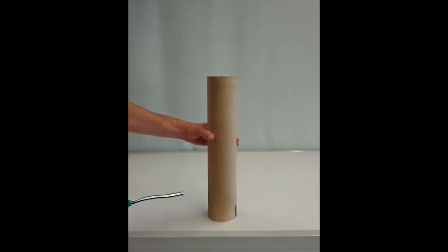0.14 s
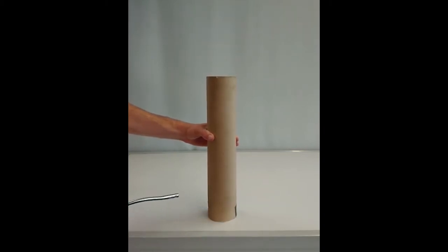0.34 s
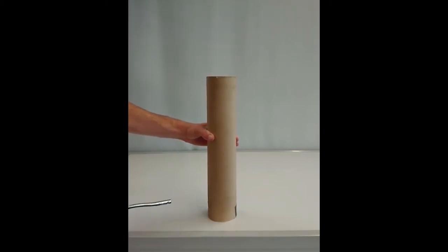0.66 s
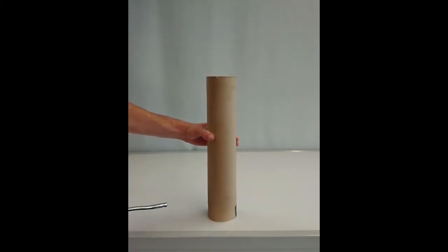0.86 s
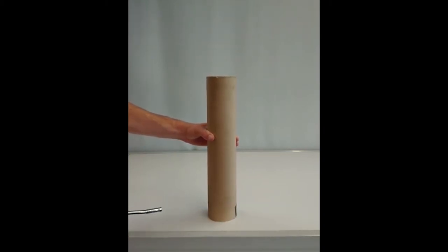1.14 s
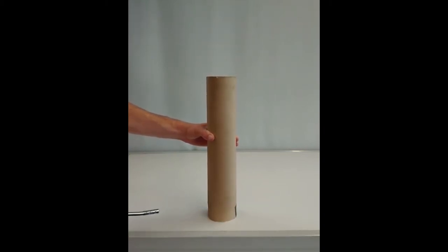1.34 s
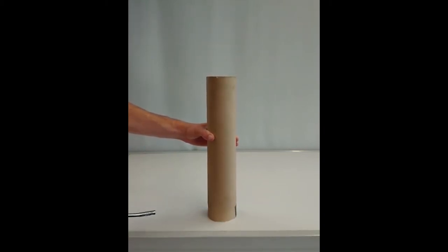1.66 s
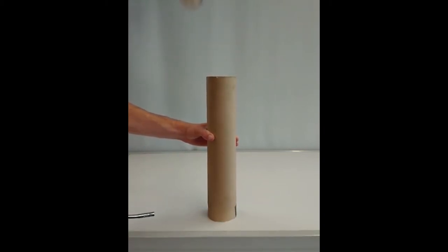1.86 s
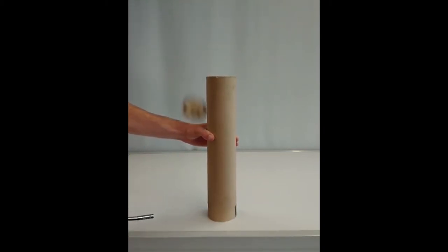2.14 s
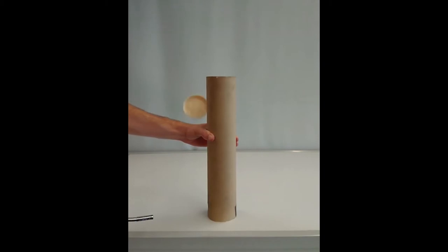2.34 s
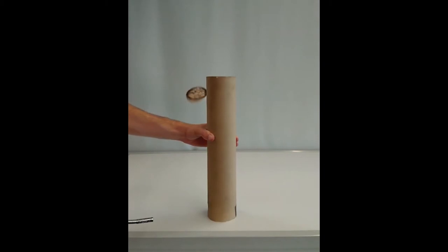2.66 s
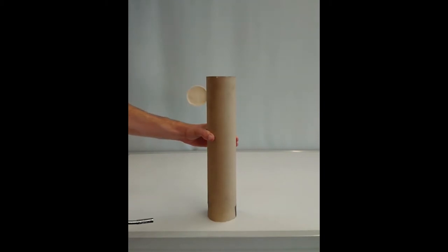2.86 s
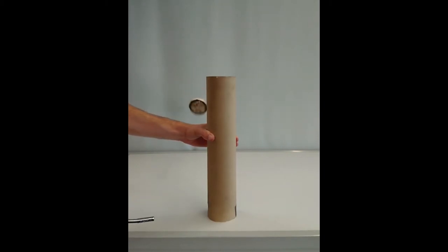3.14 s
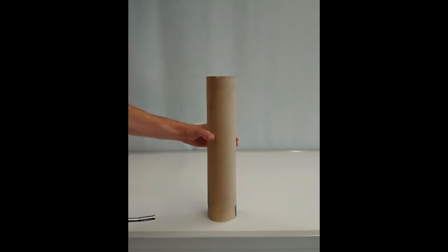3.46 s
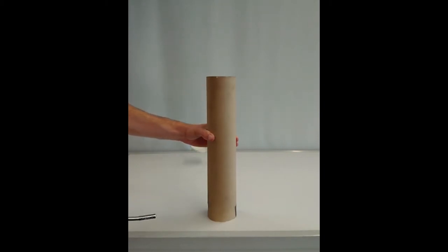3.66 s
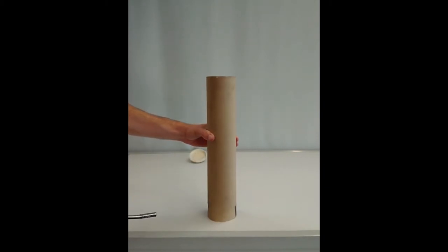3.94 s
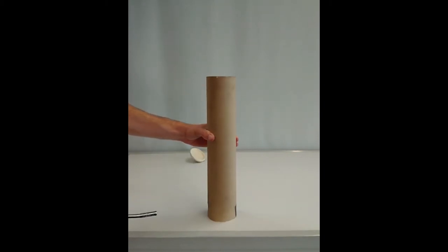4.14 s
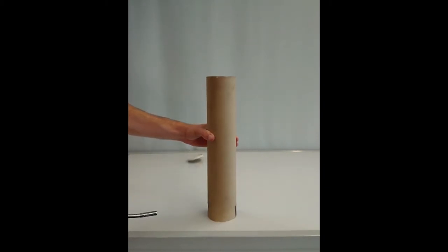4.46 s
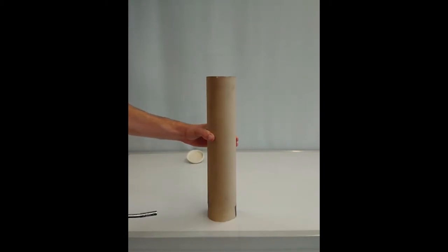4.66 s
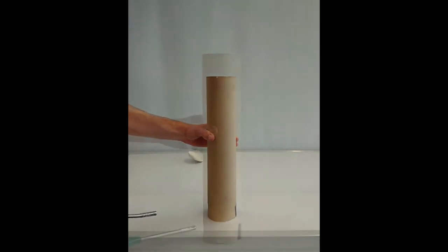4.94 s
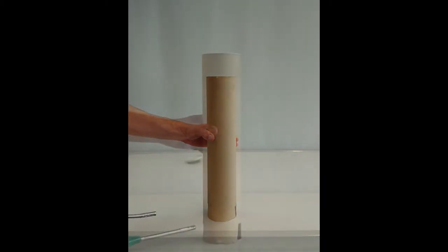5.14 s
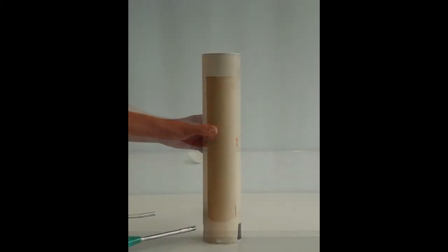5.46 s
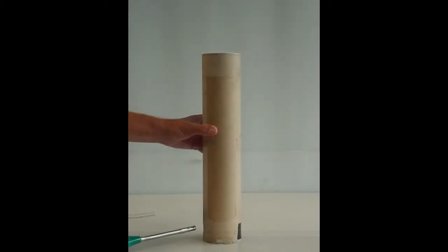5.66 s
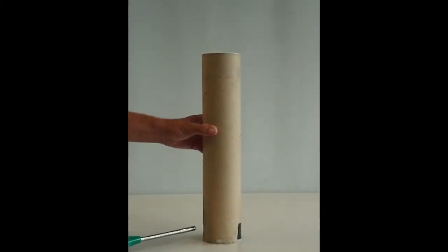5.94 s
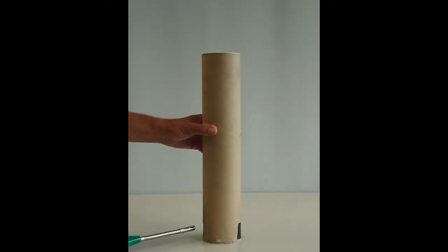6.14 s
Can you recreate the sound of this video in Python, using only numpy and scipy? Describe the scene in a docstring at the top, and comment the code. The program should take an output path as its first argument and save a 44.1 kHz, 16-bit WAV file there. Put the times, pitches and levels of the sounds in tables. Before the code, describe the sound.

Quarter-speed sound in a bare, echoing room. The dark boom of a gas pop is already dying away when a lid slaps the ceiling, leaving a bright wash of echo. About two seconds later it thuds dully on a hand, then clatters hard on a table in a tight burst of knocks. The ringing fades into a quieter room tone. Stereo microphones, with a grainy slowed treble.

```python
"""A lid, shot off a cardboard tube by a gas pop in a bare room, is heard at quarter speed.
It slaps the ceiling, thuds on a hand and clatters on the table: shaped clicks, echoes and damped swings.
Fading noise makes the boom of the pop and the long ring after each blow; steady noise and a drone lie below.
A dissolve then leads to a quieter shot of the room. The slow playback mirrors sound into the treble."""
import sys
import numpy as np
from scipy import signal
from scipy.fft import rfft, irfft, next_fast_len
from scipy.io import wavfile

SR = 44100
rng = np.random.default_rng(int(sys.argv[2]) if len(sys.argv) > 2 else 0)


def store_pcm(level_fs):
    """Save levels as 16-bit WAV."""
    pcm = np.round(np.clip(level_fs, -1, 1) * 32767).astype(np.int16)
    wavfile.write(sys.argv[1], SR, np.atleast_2d(pcm).T)


def gain_from_db(level_db):
    """Turn a decibel level (scalar or array-like) into a linear amplitude factor."""
    decades = np.asarray(level_db, float) / 20
    return 10 ** decades


N = 277389  # length in samples

# Blows of the lid, their clearest echoes and two late taps. Each row: start in seconds, click peak in dB,
# lean to the left in dB (98 % of it is used), delay of the right port in ms, dulling in dB per octave.
ARRIVALS = [(0.2742, -14, 3.9, 1.7, -4), (0.303, -24, -12, -0.6, -0.5), (0.343, -25.5, 14, -2.3, -1.5),
            (2.4945, -24.5, -0.5, 0.6, -3.5), (2.532, -30.5, -1.5, -0.8, -6), (2.551, -34.5, -5, 0.9, 3.5),
            (4.0911, -9, -0.5, -0.9, -2.4), (4.1053, -9, 4, 0.3, -2.5), (4.1150, -12.5, -1, -1, -2),
            (4.1234, -14.5, -2, 2, -7), (4.1515, -16, -4.5, 0.8, -5.5), (4.1832, -14, 2.5, -0.2, -5),
            (4.187, -20, -10, 0.2, 0.5), (4.2166, -15, 2, 2, -0.5), (4.244, -18.5, -4, 1.1, -1),
            (4.296, -21, 0, 0.5, 0.5), (4.321, -21, 4.5, -.14, 2), (4.351, -23, 0, 0, -3.5),
            (5.422, -42.5, -11.5, 0.4, 6), (5.6170, -34.5, -1, -0.5, 1.5)]
# Colour of the lid's blow on ceiling, hand and table. Each row: pitch in Hz, relative level in dB.
BLOW_COLOURS = [
    [(88, -39), (150, -2.5), (249, -9), (389, -12.5), (813, -8), (1500, -28), (1730, -14.5), (2210, -16),
     (2610, -11.5), (3190, -13.5), (4080, -25), (4410, -42), (5900, -53), (7670, -80), (13000, -120)],
    [(71, -34.5), (120, 0.5), (219, -7.5), (480, -13.5), (982, -14.5), (1140, -22.5), (1270, -24),
     (1550, -25.5), (2150, -35.5), (2500, -34.5), (2790, -43), (3180, -42), (4330, -65), (5900, -85.5),
     (7670, -109), (13000, -120)],
    [(88, -25.5), (150, -11.5), (265, -2.5), (545, -4), (697, -0.5), (878, -4.5), (1290, -11.5),
     (1370, -16.5), (2140, -19.5), (3000, -30), (3960, -42.5), (4270, -52.5), (5900, -62.5), (7670, -94.5),
     (13000, -120)],
]
# Ring of the room after pop, ceiling, hand and table. Each row: start in seconds, level in dB before
# build-up and fading, build-up time in seconds, factor on the room's fading time.
RINGS = [(-.3, -29, .011, 1.41), (0.273, -37.5, 0.005, 1.214), (2.494, -37.5, 0.0067, 0.84),
         (4.088, -30.5, 0.04, 1.267)]
# Colour of each of these rings. Each row: pitch in Hz, relative level in dB.
RING_COLOURS = [
    [(12, -36.5), (20, -14), (54, -6.5), (110, -18.5), (138, -16.5), (189, -27), (297, -38.5), (729, -44),
     (1120, -35), (1500, -47), (1670, -41.5), (3280, -44.5), (4300, -55.5), (5590, -100), (9460, -120)],
    [(120, -14.5), (200, 1), (276, -5), (455, -10), (770, -5.5), (910, -7.5), (1090, -8.5), (1320, -10),
     (1680, -10), (2570, -10.5), (3280, -6.5), (4030, -20), (4300, -54.5), (5590, -67), (9460, -120)],
    [(12, -61.5), (20, -7.5), (43, -17.5), (86, -2), (135, -12), (297, -12.5), (339, -20), (623, -13),
     (762, -20), (872, -20.5), (954, -22), (2000, -36.5), (3280, -38.5), (4300, -56.5), (5590, -105),
     (9460, -120)],
    [(12, -39.5), (20, -2), (48, -29.5), (92, -9), (129, -21.5), (221, -4), (397, -6), (681, 1), (1310, -9),
     (1670, -8.5), (2870, -14), (3840, -19), (4300, -24), (5590, -84), (9460, -120)],
]
# Resonances that stand out of each ring. Each row: centre in Hz, added height in dB, width in Hz.
RING_PEAKS = [
    [],
    [(745, -9, 120), (1102, 4.5, 230), (1680, -5, 80), (2930, -7, 55)],
    [(90.5, 3, 23), (300, -5, 22)],
    [(98, 6, 29), (194, -9, 20), (517, -7.5, 53), (720, -9, 420), (1144, 3.5, 52), (1637, -2, 55),
     (1820, 4.5, 19)],
]
# How slowly the room fades. Each row: pitch in Hz, seconds to fall 60 dB before the ring's own factor.
ROOM_FADE = [(30, 4.2), (60, 3), (110, 3.11), (280, 3.03), (740, 3.24), (1900, 3.545), (4000, 1.5)]
# How alike left and right are. Each row: pitch in Hz, likeness from 0 to 1.
LIKENESS = [(40, 1), (70, .85), (130, 0.54), (290, .12), (600, .01)]
# Colour of the room tone in the first and second shot. Each row: pitch in Hz, relative level in dB.
TONE_COLOURS = [
    [(12, -38), (20, -10.5), (81, -7), (118, -1.5), (169, -27.5), (237, -15.5), (347, -32), (609, -23),
     (797, -28.5), (872, -13.5), (1400, -37.5), (2680, -29.5), (4300, -43), (5590, -102), (9460, -120)],
    [(12, -30), (20, -1), (27, -7.5), (189, -18.5), (259, -23.5), (355, -9), (397, -23.5), (486, -20.5),
     (745, -36.5), (815, -15), (1070, -41), (1190, -24), (1340, -47), (3280, -41.5), (4300, -35.5),
     (5590, -52), (9460, -120)],
]
# Average (rms) level of the two room tones in dB, before the dissolve.
TONE_LEVELS_DB = [-68.5, -73.5]
# A fuzzy low drone: centre in Hz, width in Hz, rms level in dB before its swell.
DRONE = (62, 14, -67)
# Rise and fall of the drone. Each row: time in seconds, change in dB.
DRONE_SWELL = [(0, 1), (1.3, -3.5), (1.9, 5), (2.498, 3.5), (4.1, -13), (6.3, -41.5)]
# Faint fuzzy tones of the first shot. Each row: centre in Hz, width in Hz, rms level in dB.
WHINES = [(875, 15, -87), (1020, 20, -90), (2592, 6, -96)]
# The dissolve between the shots: start in seconds, end in seconds.
DISSOLVE = (4.72, 5.775)
# Low swing of air and surface under each blow. Each row: start in seconds, pitch in Hz, level in dB,
# seconds to fall 60 dB, left over right in dB.
THUDS = [(0.2801, 121.5, -27, 0.036, -7), (2.4930, 98, -20, 0.086, -2.5), (2.495, 251, -28, 0.037, -3.5),
         (4.0865, 216, -27.5, 0.18, -1.5), (4.096, 95, -31.5, 0.23, -5.5)]
# Difference between the ports, shared out between them. Each row: pitch in Hz, left over right in dB.
PORTS = [(60, -5), (130, -3.5), (250, -5.5), (490, -3.5), (700, -2.5), (1080, 6), (1700, -7), (3100, 5),
         (6000, -3.5), (9000, 1), (15000, -2)]
# Ways the lid rings. Each row: pitch in Hz, relative level in dB, seconds to fall 60 dB if left untouched.
LID_MODES = [(694, -11, 0.28), (1243, 0, 0.0079), (1710, -8, 0.084), (2125, -13.5, 0.052)]
# What trails each arrival from ceiling, hand and table. Each row: ringing of the lid in dB,
# scatter in dB before smearing, seconds for the scatter to fall 60 dB.
TRAILS = [(-30.5, -29, .04), (-27, -18.5, 0.081), (-31.5, -21.5, 0.055)]
# Small echoes strewn by chance behind the blow on ceiling, hand and table. Each row: level in dB
# at the blow, change in dB per second, span in seconds, dulling in dB per octave.
STREWN = [(-25.5, -40, .04, 2.5), (-27, -63, 0.054, 1), (-21.5, -30.5, .012, 0)]
# Number of strewn echoes behind ceiling, hand and table.
STREWN_COUNTS = [2, 2, 2]

HISS_DB = -101
SLOWED_RATE = 48000 / 4  # samples a second left at quarter speed
STEADY_EDGE_HZ = 4150  # the washes end here; late echoes are weak above it
STREWN_SPREAD_DB, STREWN_PAN_DB = 2, 4  # either way
LAG_MS_PER_DB = 0.24  # delay of the right port for each dB of lean to the left
SMEAR_DB_PER_S, SMEAR_MOST_DB = 39.5, 7  # later echoes turn from click to scatter
LONGEST_RING_S = 0.048  # contact damps every mode of the lid to this 60 dB fall time at most


def read(points, hz):
    """Value of a table at a pitch, read along a log axis as we hear pitch."""
    f, value = np.transpose(points)
    return np.interp(np.log(hz + 1), np.log(f + 1), value)


def amp_of(points, hz):
    """Gain read from a table of pitch in Hz and level in dB."""
    return gain_from_db(read(points, hz))


def evened(x):
    """Scaled to an average (rms) strength of 1."""
    return x / np.sqrt(np.mean(x ** 2) + 1e-30)


def fuzzy_tone(centre_hz, width_hz, db, channels):
    """Noise through one narrow resonance sounds like a wavering tone."""
    hz = np.fft.rfftfreq(N, 1 / SR)
    resonance = 1 / (1 + ((hz - centre_hz) / width_hz * 2) ** 2)
    noise = rng.standard_normal((channels, N))
    return gain_from_db(db) * evened(irfft(rfft(noise) * resonance, N))


def hum():
    """A low drone, alike in both ports, with faint whines above it: all narrow noises."""
    swell_db = np.interp(np.arange(N) / SR, *np.transpose(DRONE_SWELL))
    drone = gain_from_db(swell_db) * fuzzy_tone(*DRONE, channels=1)
    return drone + sum(fuzzy_tone(*whine, channels=2) for whine in WHINES)


def diffuse(colour, shape):
    """Sound from all around: two partly alike noises with a fixed colour(Hz), then a gain shape(Hz, s)."""
    size = next_fast_len(N + 4096)
    fine_hz = np.fft.rfftfreq(size, 1 / SR)
    spectra = rfft(rng.standard_normal((2, size)))
    same = np.clip(read(LIKENESS, fine_hz), -1, 1)
    spectra[1] = same * spectra[0] + np.sqrt(1 - same ** 2) * spectra[1]
    edge = 1 + (fine_hz / STEADY_EDGE_HZ) ** 60
    noise = evened(irfft(spectra * colour(fine_hz) / edge, size))
    # Cut into short overlapping slices so that each pitch can change with time.
    hz, t, slices = signal.stft(noise, SR, nperseg=1024, noverlap=768)
    shaped = slices * shape(hz[:, None], t)
    return signal.istft(shaped, SR, nperseg=1024, noverlap=768)[1][:, :N]


def room_tone(colour, db):
    """Steady air and machinery of the building, as coloured noise."""
    return gain_from_db(db) * diffuse(lambda hz: amp_of(colour, hz), lambda hz, t: 1)


def ring(start, db, build, slower, colour, peaks):
    """Echoes thicken after the blow into a wash whose bands die at their own speeds."""
    def tint(hz):
        """Colour in the two ports, with resonances standing out."""
        lift = 1 + sum(gain_from_db(lift_db) / (1 + ((hz - f) / width * 2) ** 2) for f, lift_db, width in peaks)
        lean = gain_from_db(read(PORTS, hz) / 2)
        return np.array([lean, 1 / lean]) * amp_of(colour, hz) * lift

    def fade(hz, t):
        """Gain of each pitch as the room takes its energy."""
        return gain_from_db(-60 * np.maximum(t - start, 0) / (slower * read(ROOM_FADE, hz)))

    age = np.maximum(np.arange(N) / SR - start, 0)
    return gain_from_db(db) * diffuse(tint, fade) * (1 - np.exp(-age / build))


def thuds():
    """Air and surface swing at a low pitch under each blow and are damped."""
    out = np.zeros((2, N))
    for start, hz, db, t60, pan_db in THUDS:
        age = np.maximum(np.arange(N) / SR - start, 0)
        side_db = np.array([[.5], [-.5]]) * pan_db
        out += gain_from_db(db + side_db - 60 * age / t60) * np.sin(2 * np.pi * hz * age)
    return out


def strewn_echoes():
    """Rows like those of ARRIVALS, denser just after each blow, from random sides."""
    rows = []
    for (start, *_), (db, fade_db, span, dulling_db), count in zip(RINGS[1:], STREWN, STREWN_COUNTS):
        for k, (place, size, side) in enumerate(rng.random((count, 3))):
            age = span * ((k + place) / count) ** 2 + .004
            pan_db = STREWN_PAN_DB * (2 * side - 1)
            level_db = db + fade_db * age + STREWN_SPREAD_DB * (2 * size - 1)
            rows.append((start + age, level_db, pan_db, LAG_MS_PER_DB * pan_db, dulling_db))
    return rows


def blow(colour, dulling_db, share, late):
    """A click of the given colour as one port hears it: nothing sounds before the hit, peak 1."""
    hz = abs(np.fft.fftfreq(8192, 1 / SR))
    lean_db = share * read(PORTS, hz) - dulling_db * np.log2(hz / 800 + 0.069)
    lean_db -= 30 * late * np.clip(hz / STEADY_EDGE_HZ * 20 - 20, 0, 1)  # late echoes lack the crack
    log_gain = np.log(amp_of(colour, hz) * gain_from_db(lean_db) + 1e-4)
    # The phase that goes with this gain packs the energy as early as it can be.
    click = np.fft.ifft(np.exp(np.conj(signal.hilbert(log_gain)))).real[:3000]
    return click / abs(click).max()


def arrivals():
    """Every blow and echo reaches the two ports at its own time and level; the lid rings and scatter trails."""
    out = np.zeros((2, N + SR))
    later_starts = [r[0] - .01 for r in RINGS[2:]]
    age = np.arange(3000) / SR
    modes = sum(gain_from_db(db - 60 * age / min(t60, LONGEST_RING_S)) * np.sin(2 * np.pi * hz * age)
                for hz, db, t60 in LID_MODES)
    for start, db, pan_db, lag_ms, dulling_db in ARRIVALS + strewn_echoes():
        which = np.searchsorted(later_starts, start)  # 0 ceiling, 1 hand, 2 table
        ring_db, scatter_db, t60 = TRAILS[which]
        since_blow = start - RINGS[which + 1][0]
        late = since_blow > .012 + .006 * which
        scatter = rng.standard_normal((2, len(age))) * gain_from_db(scatter_db - 60 * age / t60)
        scatter *= np.minimum(age / 0.0021, 1)  # the scatter fades in
        smear = gain_from_db(min(SMEAR_DB_PER_S * since_blow, SMEAR_MOST_DB) / 2)
        drive = smear * scatter + gain_from_db(ring_db) * modes
        drive[:, 0] = 1 / smear  # the click itself
        # Left, then right: delay in seconds, share of the lean between the ports.
        for side, delay, share in ((0, 0.00077, 0.43), (1, lag_ms / 1000, -0.55)):
            click = blow(BLOW_COLOURS[which], dulling_db, share, late)
            sound = signal.fftconvolve(drive[side], click)
            at = round((start + delay) * SR)
            out[side, at:at + len(sound)] += gain_from_db(db + share * pan_db) * sound
    return out[:, :N]


def scene():
    """The first shot fades out as the second fades in."""
    rings = sum(ring(*r, *more) for r, *more in zip(RINGS, RING_COLOURS, RING_PEAKS))
    first = room_tone(TONE_COLOURS[0], TONE_LEVELS_DB[0]) + hum() + rings + thuds() + arrivals()
    second = room_tone(TONE_COLOURS[1], TONE_LEVELS_DB[1])
    mix = np.interp(np.arange(N) / SR, DISSOLVE, (0, 1))
    return (1 - mix) * first + mix * second


def band_limit(x):
    """A steep low-pass at the top of the band."""
    return signal.sosfilt(signal.butter(12, 16480, fs=SR, output="sos"), x)


def record(dry):
    """Quarter speed leaves few samples a second; straight lines between them mirror the band into the treble."""
    padded = np.pad(dry, ((0, 0), (0, SR // 10)), "linear_ramp")
    size = padded.shape[1]
    count = round(size / SR * SLOWED_RATE)
    sparse = signal.resample(padded, count, axis=1)
    joined = np.array([np.interp(np.arange(4 * count) / 4, np.arange(count), side) for side in sparse])
    full_rate = signal.resample(joined, size, axis=1)[:, :N]
    top_cut = signal.firwin(401, 15500, window=("kaiser", 8), fs=SR)  # lets through what lies below 15500 Hz
    out = signal.oaconvolve(full_rate, top_cut[None], "same")
    out += gain_from_db(HISS_DB) * rng.standard_normal(out.shape)
    return band_limit(out)


dry = scene()
out = record(dry)
store_pcm(out)
```